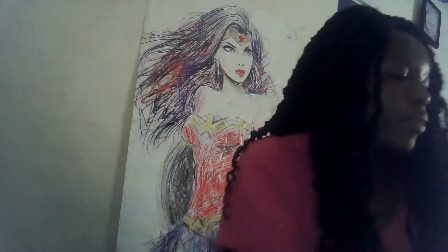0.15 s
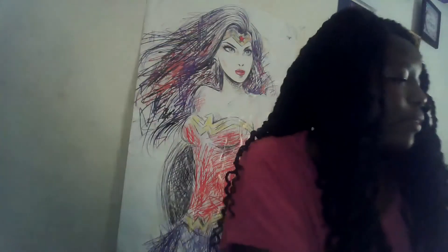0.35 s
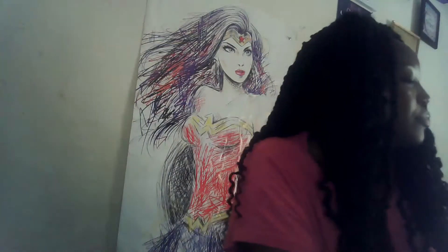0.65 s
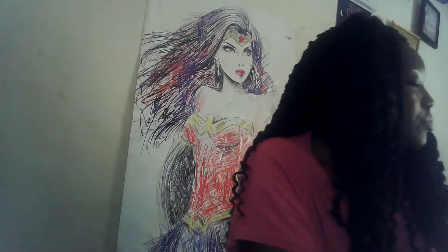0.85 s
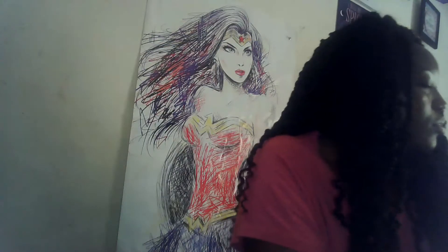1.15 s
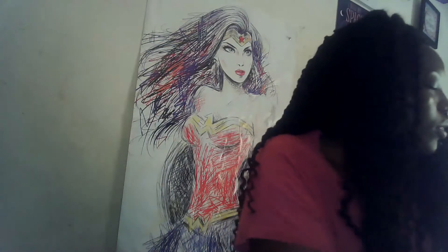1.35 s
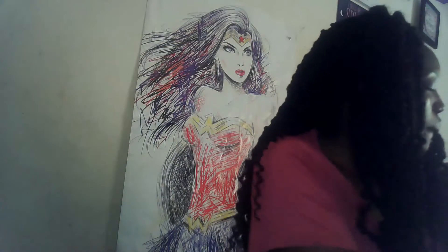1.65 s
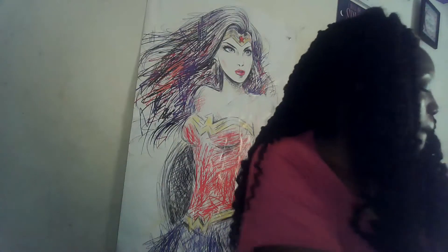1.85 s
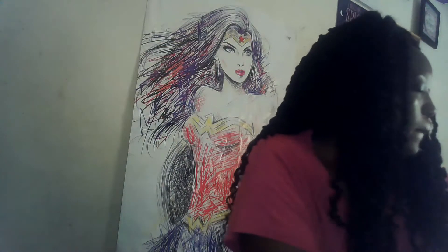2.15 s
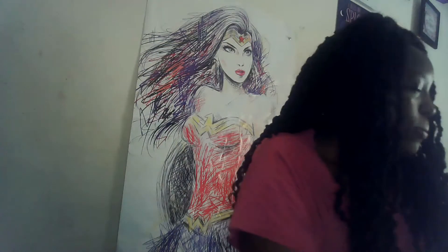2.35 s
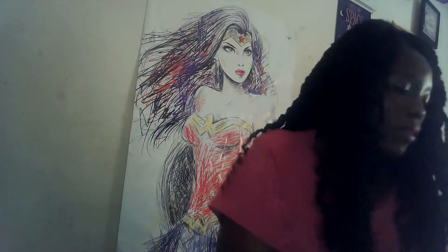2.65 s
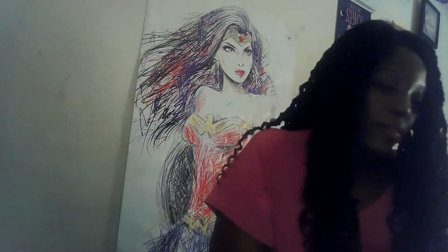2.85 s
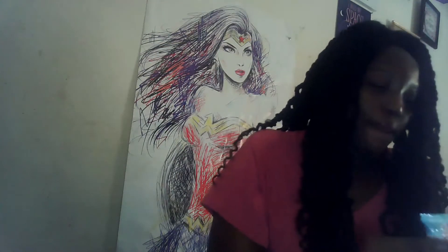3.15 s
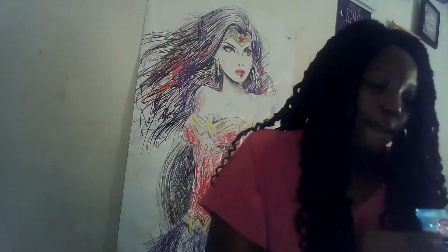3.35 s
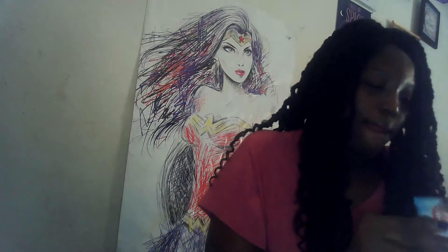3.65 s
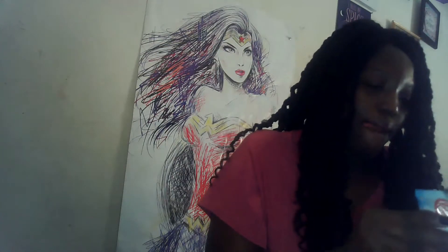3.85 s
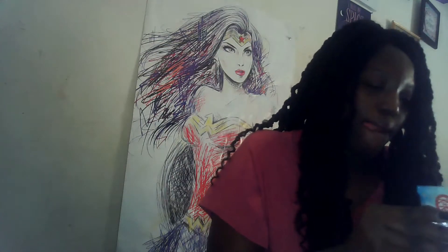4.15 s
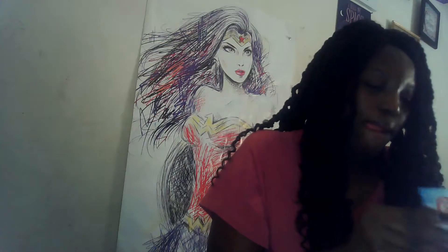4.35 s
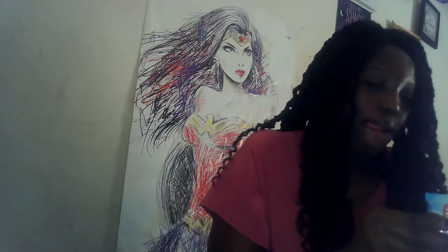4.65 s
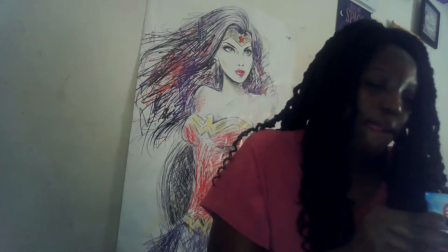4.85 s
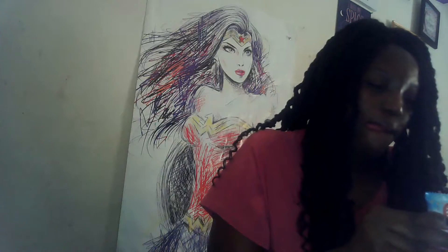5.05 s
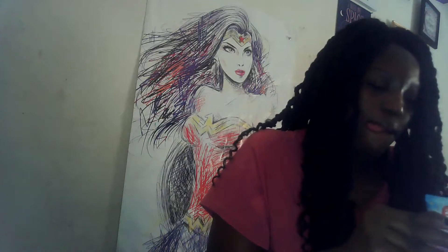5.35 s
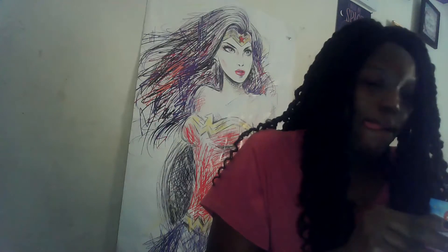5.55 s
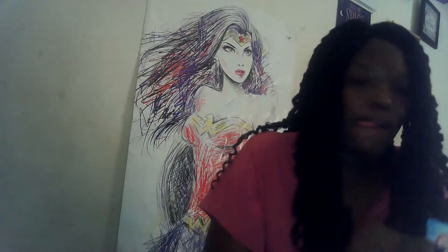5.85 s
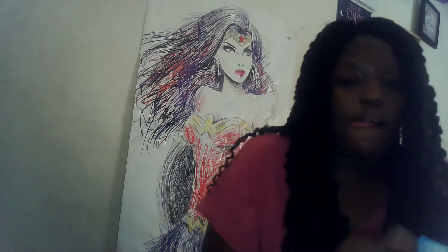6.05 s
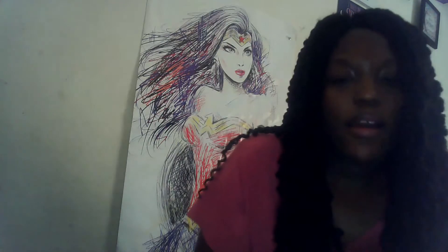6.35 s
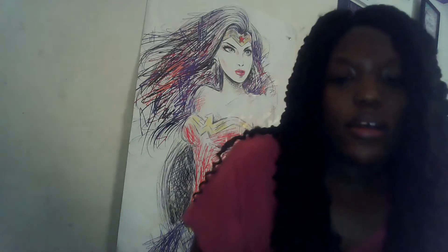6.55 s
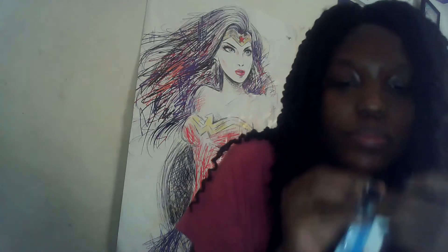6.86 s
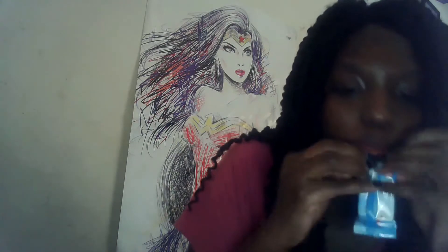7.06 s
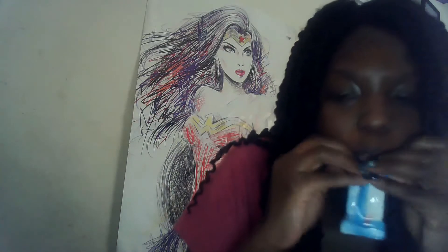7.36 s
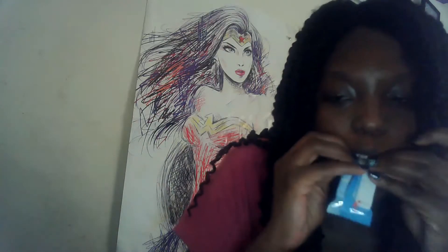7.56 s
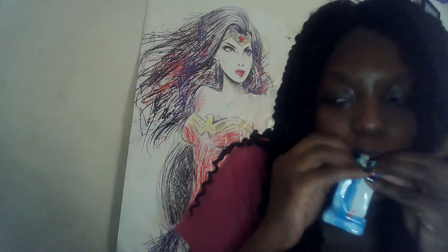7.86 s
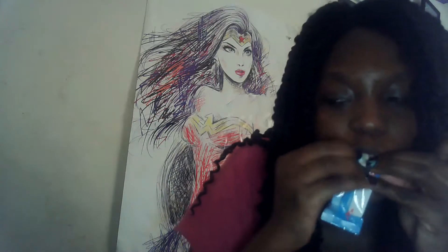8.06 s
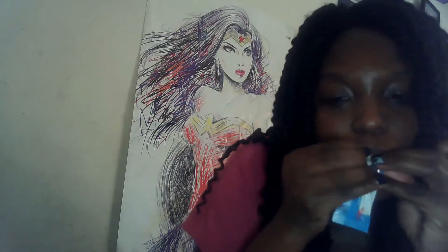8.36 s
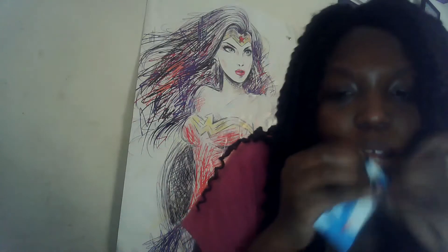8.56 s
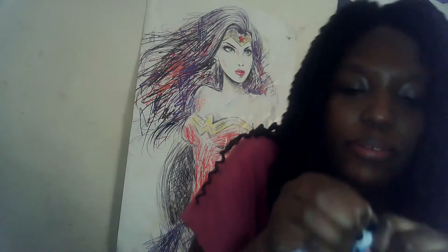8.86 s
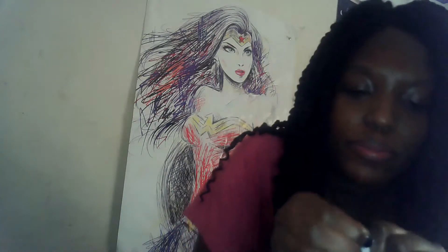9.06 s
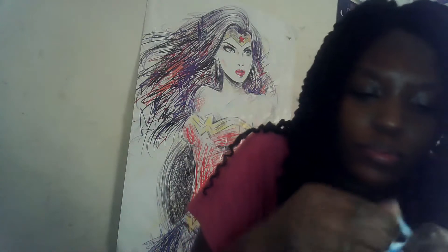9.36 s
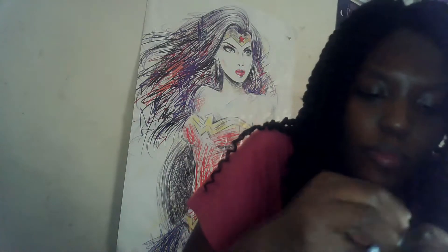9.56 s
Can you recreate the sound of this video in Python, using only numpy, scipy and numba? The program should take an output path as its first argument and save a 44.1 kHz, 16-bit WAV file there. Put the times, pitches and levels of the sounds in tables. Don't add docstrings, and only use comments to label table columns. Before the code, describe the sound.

Hands rummage noisily through a cardboard box of crinkly snack packets, then one plastic wrapper crackles, snaps and tears close to the microphone.

```python
import sys
import numpy as np
from scipy import signal
from scipy.fft import rfft, irfft
from scipy.io import wavfile
from scipy.ndimage import uniform_filter1d
from numba import njit

SR = 44100
rng = np.random.default_rng(int(sys.argv[2]) if len(sys.argv) > 2 else 0)


def pcm_store(signal):
    levels = np.round(np.clip(np.atleast_2d(signal), -1, 1) * 32767)
    wavfile.write(sys.argv[1], SR, levels.astype(np.int16).T)


def volts_from_db(level):
    exponent = np.asarray(level, float) / 20
    return 10 ** exponent


N = 428211


@njit
def add(out, at, hz, decay_s, size, phase):
    for k in range(len(at)):
        first = int(at[k]) + 1
        pole = complex(-1 / decay_s[k], 2 * np.pi * hz[k]) / SR
        ring = size[k] * np.exp(1 + pole * (first - at[k]) + 1j * phase[k]) / (decay_s[k] * SR)
        turn = np.exp(pole)
        last = min(first + int(10 * decay_s[k] * SR) + 2, len(out))
        for j in range(max(first, 0), last):
            out[j] += ring.imag * (j - at[k])
            ring *= turn


@njit
def resonate(x, hz, width_hz):
    y, band, low = np.empty(len(x)), 0., 0.
    g, damping = np.tan(np.pi * hz / SR), width_hz / hz
    for i in range(len(x)):
        v = (band + g * (x[i] + 1e-18 - low)) / (1 + g * (g + damping))
        band, low = 2 * v - band, low + 2 * g * v
        y[i] = damping * v
    return y


# frequency in Hz, density in dB per Hz.
HISS_COLOUR = [(15, -4.5), (28, 6), (65, -5), (108, 2), (293, -9), (1230, -15), (5430, -17), (16000, -20.5)]


def hiss():
    hz = np.maximum(np.arange(N // 2 + 1) * SR / N, 1)
    colour_hz, colour_db = np.transpose(HISS_COLOUR)
    colour = volts_from_db(np.interp(np.log(hz), np.log(colour_hz), colour_db))
    shared = np.clip(40 / hz, .05, .7)
    noise = rfft(rng.standard_normal(size=(3, N)))
    out = irfft(colour * (np.sqrt(shared) * noise[0] + np.sqrt(1 - shared) * noise[1:]), N)
    return out / out.mean(axis=0).std() * volts_from_db(-50.5 + np.array([[1.2], [-1.2]]))


def walls(x):
    t60_s, treble_t60_s = .22, .055
    t = np.arange(SR // 2) / SR
    noise = rng.standard_normal(size=(2, len(t))) * np.minimum(t / 0.0001, 1)
    dull = signal.lfilter(*signal.butter(2, 6500, fs=SR), noise)
    echoes = dull * volts_from_db(-60 * t / t60_s) + (noise - dull) * volts_from_db(-60 * t / treble_t60_s)
    echoes /= np.sqrt((echoes ** 2).sum() / 2)
    return signal.fftconvolve(x[None], echoes, axes=1)[:, :N]


# frequency in Hz, width in Hz, level in dB.
PORT_RINGS = [
    (4300, 1154, 17),
    (5050, 875, 17),
    (16740, 5000, 0.5),
]


def ports(air):
    rung = []
    for x in air:
        rings = sum(volts_from_db(db) * resonate(x, float(hz), float(width)) for hz, width, db in PORT_RINGS)
        rung.append(x + rings)
    left, right = rung
    right = right + volts_from_db(2.) * resonate(right, 10000., 8000.)
    pan_db = 10.
    return np.array([left * volts_from_db(pan_db / 2), right * volts_from_db(-pan_db / 2)])


# time in seconds, lead in samples.
LEFT_LEAD = [(0, 5.95), (9.7, 3.57)]


def creases(s, db, ring_hz, knock_db, tick_db, slips):
    out = np.zeros((2, N))
    lead = np.interp(s, *np.transpose(LEFT_LEAD))
    for late_ms, slip_db in slips:
        u = rng.random(size=(len(s), 9)).T
        at = s * SR + u[0] * late_ms * SR / 1000
        hz = ring_hz if late_ms == 0 else 3500 * 1.908 ** u[1]
        ring = (hz, .0002, -9.)  # Hz, decay in s, dB
        knock = (1050 * 2.75 ** u[2], .00065, knock_db - 3.0)
        tick = (10000 * 1.64 ** u[3], .00005, tick_db + 10.5 - abs(late_ms))
        for (part_hz, decay_s, part_db), turn in zip([ring, knock, tick], u[4:]):
            for port, sign in enumerate([1, -1]):
                phase = 2 * np.pi * turn + port * 4.2 * (u[7] - .5)
                size = volts_from_db(db + slip_db * (.6 + .8 * u[8]) + part_db + sign * 3 * (u[1] - .5))
                decays = np.full(len(s), decay_s)
                add(out[port], at + port * lead, np.minimum(part_hz, .4 * SR), decays, size, phase)
    return out


def swarm(effort_db, knock_db, tick_db, scatter_db, span_s, count):
    u = rng.random(size=(count, 3)).T
    start_s, end_s = span_s
    at = ((start_s + u[0] * (end_s - start_s)) * SR).astype(int).clip(0, N - 1)
    db = effort_db[at] - scatter_db * np.log(u[1] + 0.16)
    return creases(at / SR, db, 2800 * 3.17 ** u[2], knock_db[at], tick_db[at], [(0, 0), (2.5, -5.5)])


# start in seconds, effort in dB, hold in ms, cardboard bump in dB against the effort.
BOX_GRABS = [(0.0, -37, 7.5, -17), (0.05, -37, 18, -21), (0.175, -30.5, 50, -26), (0.3, -32, 17.6, -13.5),
             (0.353, -20.5, 4.2, -24), (0.413, -30, 11.7, -13), (0.466, -35.5, 58, -9),
             (0.538, -19.5, 10.4, -25), (0.597, -15, 8.1, -20.5), (0.644, -22.5, 7.3, -16),
             (0.69, -32.5, 18, -10.5), (0.776, -24, 27.6, -16), (0.82, -33.5, 4.3, -2),
             (0.869, -25, 13.5, -21.5), (0.945, -27, 18.6, -16.5), (1.007, -23.5, 10.5, -21),
             (1.056, -22, 18.2, -15.5), (1.089, -39, 17, -7), (1.176, -26.5, 27, -15.5),
             (1.268, -32, 35, -21.5), (1.415, -17.5, 12, -21.5), (1.534, -24.5, 12.5, -23),
             (1.611, -31.5, 24.6, -22), (1.73, -21, 19.5, -19), (1.912, -30.5, 15.5, -14.5),
             (1.977, -33, 16, -32), (2.036, -34.5, 26.6, -18.5), (2.185, -36.5, 11.3, -14.5),
             (2.26, -34.5, 13, -21), (2.304, -44, 41, -20)]


def grabs(db):
    power = np.full(N, 1e-9)
    for (s, _, hold_ms, _), level in zip(BOX_GRABS, volts_from_db(db)):
        start = int((s + .004) * SR)
        t = np.arange(SR // 2) / SR / (max(hold_ms, 5) / 1000)
        power[start:start + len(t)] += level ** 2 * t * np.exp(1 - t)
    step = SR // 60
    fidget = uniform_filter1d(np.repeat(rng.standard_normal(N // step + 1), step), step)[:N]
    return 10 * np.log10(power) + 3. * fidget


# frequency in Hz, width in Hz, level in dB.
CARDBOARD_MODES = [(82, 15, -0.5), (234, 65, 4.5), (334, 76, 7.5), (770, 800, 4.5), (1047, 130, 12.5),
                   (1210, 580, 0.5)]


def box():
    _, grab_db, _, bump_db = np.transpose(BOX_GRABS)
    packets = swarm(grabs(grab_db) - 9.5, np.full(N, -11.), np.full(N, -18.), 4.6, (0, 2.6), count=3500)
    u = rng.random(size=(3, N))
    bumps = (u[0] < .05) * volts_from_db(-2.5 * np.log(u[1])) * np.sign(u[2] - .5)
    body = np.zeros(N)
    for k, (hz, width, db) in enumerate(CARDBOARD_MODES):
        body += (-1) ** k * volts_from_db(db) * resonate(bumps, float(hz), float(width))
    body = body / body.std() * volts_from_db(grabs(grab_db + bump_db) + 4.5)
    return packets + np.array([body, np.roll(body, shift=4) * volts_from_db(1.0)])


# start in seconds, peak in dB,
# frequency in Hz.
AIR_POPS = [(0.053, -36.5, 696), (1.281, -28, 1000), (1.458, -28, 1000), (2.058, -38, 755),
            (3.4255, -39.5, 1300), (0.647, -26, 1200), (4.1, -47, 504), (4.176, -41.5, 500),
            (5.806, -47, 493), (6.778, -45, 415), (7.075, -39, 706), (8.205, -48, 657), (8.218, -48, 650),
            (8.241, -50, 830), (8.257, -43, 695), (8.356, -42, 710), (8.463, -46, 766), (8.514, -47, 720),
            (8.659, -43, 660), (9.274, -45.5, 630), (9.266, -37, 2720)]
# start in seconds, peak in dB, frequency in Hz.
HOLLOW_KNOCKS = [
    (0.612, -21, 1050),
    (0.655, -21, 1260),
    (9.2605, -41, 2800),
    (9.2745, -42, 2500),
]


def pops(table):
    s, db, hz = np.transpose(table)
    out = np.zeros(N)
    add(out, s * SR, hz, np.full(len(s), .00093), volts_from_db(db + 4), 2 * np.pi * rng.random(len(s)))
    return out


SNAP_LATE_S, SNAP_TICK_DB = 0.000911, 6.5

# start in seconds, peak in dB, ring in Hz, bright tick in dB.
SMALL_TICKS = [(4.0735, -24.5, 3800, -11), (0.2077, -29, 3530.0, -13), (0.256, -19, 3800, -17),
               (0.2934, -21, 3790.0, -22), (0.2996, -25, 3500, -19), (0.6078, -15, 3000, -34),
               (0.6918, -10, 4090.0, -26), (0.7539, -23, 3680, -28.0), (0.8092, -16.0, 5000.0, -18),
               (0.8254, -12, 4260.0, -27), (0.8741, -15, 4480.0, -26), (1.0078, -14, 4740.0, -17.5),
               (1.0725, -15, 5660, -12), (1.1355, -23, 4350.0, -21), (1.2839, -13, 4730, -31),
               (1.4547, -13, 4300, -21), (1.4686, -17.0, 4660, -17), (1.4832, -21, 5000, -31.0),
               (1.6174, -22, 5600, -21), (1.6229, -20, 4070, -26), (1.6593, -22, 4390.0, -24),
               (1.7194, -21, 4170, -21), (1.7532, -29, 5250.0, -27), (1.8051, -24, 5170.0, -12),
               (1.9199, -22, 3010.0, -29), (1.9799, -18.5, 5600, -23), (1.9872, -12.5, 5430, -30.0),
               (2.0279, -30.0, 5600.0, -16), (2.0459, -20, 4130.0, -18), (2.1984, -18, 5100, -27.0),
               (2.4692, -34, 5070, -20.0), (2.6908, -25.5, 4770, -18.0), (8.692, -38, 4500, -5),
               (3.0469, -29, 5300.0, -25), (3.1676, -22, 5300, -15), (3.2036, -20, 5040.0, -28.0),
               (3.2272, -36, 4220.0, -26.0), (3.2671, -31, 4950.0, -22.0), (3.3043, -23, 5170.0, -15),
               (3.4347, -16, 4820.0, -28), (3.4945, -33, 5300, -20), (3.6621, -27, 5260, -9),
               (3.818, -27, 6900, -6), (8.581, -37, 4500, 0), (3.8944, -34, 4310.0, -10),
               (4.1005, -36, 5300, -20.0),
               (4.128, -22.5, 5270, -9), (4.3752, -39, 5120.0, -16.0), (4.49, -29.5, 4350.0, -18),
                    (4.5428, -39, 4350.0, -12), (4.823, -32, 5300, -18), (5.2573, -23.5, 4620, -5.5),
                    (5.6423, -32, 4780.0, -8), (5.78, -20, 6000, -15), (5.969, -26, 4390.0, -8),
                    (6.046, -26, 6890.0, -3), (6.0659, -23, 6400, 0.5), (6.5012, -16.5, 5810.0, -16),
                    (6.5547, -19.5, 5560, -14), (6.6139, -41, 5120.0, -22), (6.719, -27, 4960, -21),
                    (6.728, -11, 5000, -24), (6.8587, -28, 4740.0, -25), (6.888, -14, 4700, -17),
                    (6.902, -18.5, 5040.0, -13), (6.9735, -26, 5430.0, -7), (6.9777, -26, 4780.0, -15.0),
                    (7.0555, -29, 3660.0, -9), (7.096, -20.5, 5030, -19), (7.1927, -32.5, 4900, -10),
                    (7.2667, -30, 4780.0, -10), (7.283, -32.0, 5040.0, -12), (7.2875, -30, 5080.0, -15.0),
                    (7.301, -32.0, 5030, -15), (7.3743, -34, 5170.0, -20.0), (7.4637, -28, 5000, -20),
                    (7.8582, -28, 4850, -18), (8.4, -26.0, 5510.0, -16), (8.406, -26, 4220, -5),
                    (8.5337, -13, 4000, -30), (8.63, -28, 3730, -24), (8.7327, -22, 4960, -22),
                    (8.8744, -24.5, 4800, -11), (8.8939, -21.0, 5040.0, -8), (8.945, -25, 3660.0, -7),
                    (9.11, -23.5, 3960.0, -12), (9.1797, -24, 5160, -20), (9.2328, -38, 5210.0, -24),
                    (9.3152, -34, 4950.0, -23.0), (9.351, -19, 4910.0, -16), (9.4044, -21.5, 5170.0, -14),
                    (9.4724, -26, 5000.0, -20.0), (9.533, -24, 4070, -22)]
FURTHER_TICKS = [(2.585, -36, 4400, -24), (7.7545, -43, 4450, -2), (5.2115, -38, 5000, -18),
                 (5.346, -36, 5200, -7), (5.387, -41, 5200, -12), (5.4085, -41, 4300, -3),
                 (7.945, -31, 4500, -18)]


def ticks(table):
    s, db, hz, tick_db = np.transpose(table)
    slips = [(0, -4), (-.8, -7), (1.2, -5), (2.2, -7), (5, -13)]
    return creases(s + SNAP_LATE_S, db - 6, hz, np.full(len(s), -17), tick_db + SNAP_TICK_DB, slips)


# start in seconds, length in seconds, effort in dB, bright tick in dB.
FINGER_SQUEEZES = [(2.571, 0.32, -42.5, -21), (2.999, 0.21, -38, -8), (3.197, 0.13, -36, -14),
                   (3.408, 0.12, -30.5, -6.5), (3.558, 0.12, -34.5, -8), (3.76, 0.2, -45.5, -19),
                   (4.06, 0.067, -33.5, -13), (4.159, 0.23, -37.5, -11), (4.4, 0.58, -52, -13),
                   (5.228, 0.021, -33, -12), (5.56, 0.12, -44.5, -8), (5.78, 0.032, -28.5, -15),
                   (5.937, 0.052, -29.5, -13), (6.02, 0.092, -34.5, -26), (6.358, 0.26, -38.5, -13),
                   (6.684, 0.065, -29.5, -17), (6.837, 0.36, -41.5, -15), (7.2, 0.093, -38.5, -6),
                   (7.355, 0.048, -41, -12), (8.131, 0.2, -37.5, -3), (8.19, 0.23, -37, -0.5),
                   (8.476, 0.062, -26.5, -20), (8.608, 0.014, -26, -11), (8.887, 0.031, -26.5, -0.5),
                   (9.107, 0.064, -32.5, -14), (9.245, 0.033, -27.5, -19), (9.319, 0.054, -33.5, -14),
                   (9.605, 0.081, -47.5, 2)]


def squeezes(db):
    attack_s, sag_db_per_s, release_db_per_s, idle_db = 0.0069, 15.5, 367, -57
    power = np.full(N, volts_from_db(idle_db) ** 2)
    t = np.arange(SR) / SR
    for (s, length_s, _, _), level_db in zip(FINGER_SQUEEZES, db):
        start = int(s * SR)
        fall_db = sag_db_per_s * t + release_db_per_s * np.maximum(t - length_s, 0)
        grip = np.minimum(t / attack_s, 1) * volts_from_db(level_db - fall_db)
        power[start:start + SR] += grip[:N - start] ** 2
    return 10 * np.log10(power)


def wrapper():
    _, _, effort_db, tick_db = np.transpose(FINGER_SQUEEZES)
    effort = squeezes(effort_db)
    brightness = squeezes(effort_db + tick_db) - effort
    return swarm(effort - 14, np.full(N, -14.), brightness, 7.66, (2.45, N / SR), count=9000)


# start in
# seconds, # peak in dB, ring in Hz, knock in dB, bright tick in dB.
BOX_SNAPS = [(0.0504, -7.5, 3880, -20, -21), (0.2194, -16.5, 5130, -30, -9.5), (0.3111, -18, 4010, -7, -23),
             (0.3591, -12, 5340, -15, -20), (0.4154, -21.5, 4360, -5, -34), (0.547, -12, 5340, -14, -17),
             (0.5566, -11, 5270, -30, -18), (0.646, -8, 4470, -12, -15), (0.7096, -17, 5040, -16, -40),
             (0.7852, -13.5, 4040, -25, -20), (0.8878, -7.5, 4400, -33, -17),
             (0.9535, -11.5, 4300, -24, -20), (1.0183, -6.5, 5770, -23, -21), (1.057, -13, 5050, -4, -17),
             (1.18, -15.5, 5270, -13, -17.5), (2.189, -22, 4960, -13, -22), (2.27, -22.5, 4000, -24, -33)]
WRAPPER_SNAPS = [(2.633, -27.5, 4340, -34, -33), (2.681, -26.5, 5050, -11, -14),
                 (2.7804, -28.5, 5320, -14, -17), (2.816, -20, 5470, -38, -22),
                 (2.871, -24.5, 5240, -21, -14.5), (2.9563, -24, 3870, -16, -20),
                 (3.0056, -20, 4500, -19, -19), (3.038, -11.5, 5300, -50, -19),
                 (3.084, -13, 4990, -25, -18), (3.1409, -22, 4870, -12.5, -4.5),
                 (3.1958, -9, 5240, -25.5, -21.5), (3.2575, -16, 6200, -25, -21),
                 (3.2942, -21.5, 4750, -17, -11), (3.3109, -14.5, 4650, -38, -7.5),
                 (3.403, -35, 5630, -12, -2), (3.424, -10, 4600, -22, -12.5), (3.491, -20, 5170, -40, -8.5),
                 (3.5655, -15.5, 5340, -26, -14.5), (3.6374, -9.5, 6100, -24.5, -12.5),
                 (3.7882, -30.5, 5340, -31, -12), (3.843, -16.5, 5270, -27, -10.5),
                 (4.0492, -22, 5340, -14, -18), (4.109, -13, 4950, -24, -16.5),
                 (4.1766, -12, 5750, -18.5, -19),
                 (4.2335, -19.5, 5960, -47, -19), (4.273, -25.5, 5300, -15.5, -6.5),
                  (4.309, -14.5, 5260, -26, -10.5), (4.471, -25, 5450, -17, -18),
                  (4.6219, -32, 5170, -18, -19), (4.7082, -32, 4500, -15, -14),
                  (4.7917, -30, 4510, -25, -27), (5.234, -18, 4600, -22, -26), (5.455, -27, 4800, -28, -19),
                  (5.567, -31, 5340, -17, -17), (5.6664, -27, 4900, -19, -6), (5.7902, -18, 5500, -36, -9),
                  (5.806, -19.5, 4830, -11.5, -8), (5.9333, -21, 5250, -24, -16),
                  (5.9593, -23, 5750, -14, -26), (6.0337, -23.5, 3320, -34, -13),
                  (6.056, -23, 5100, -25, -10), (6.096, -26, 5100, -22, 1.5),
                  (6.392, -25.5, 5570, -21, -1.5), (6.428, -23, 4080, -10.5, -24),
                  (6.4901, -20, 5900, -13.5, -12), (6.5386, -14, 5570, -22, -25),
                  (6.7108, -12, 4530, -23, -20.5), (6.7742, -21.5, 5070, -8.5, -19),
                 (6.8471, -20, 4440, -16, -21.5), (6.883, -14.5, 4760, -17, -19),
                 (6.8945, -14, 5100, -47, -12), (6.9453, -20.5, 4720, -16, -10),
                 (6.9646, -10, 4500, -29, -20), (7.0185, -23, 4700, -40, -19),
                 (7.0756, -1.5, 4700, -41, -32), (7.2176, -16, 5550, -44, -11.5),
                 (7.3883, -11, 4940, -28.5, -20), (7.456, -25.5, 4960, -13, -23),
                 (7.5912, -10.5, 5070, -51, -22.5), (7.6467, -18.5, 4300, -36, -11.5),
                 (7.6965, -12.5, 4260, -26.5, -12.5), (7.782, -12, 4940, -27, -19),
                 (7.9167, -20, 4300, -32, -6.5), (7.9968, -33.5, 4470, -30, -10),
                 (8.1202, -20.5, 4900, -33, -23), (8.1388, -18.5, 4500, -23.5, -12.5),
                 (8.2023, -26, 5600, -25, -20), (8.216, -12.5, 4770, -18, -18), (8.243, -5, 4860, -25, -23),
                 (8.287, -16.5, 4280, -17, -12), (8.3021, -16.5, 4800, -15.5, -14),
                 (8.3524, -6, 4960, -21.5, -19.5),
                 (8.4595, -17.5, 5200, -21, -24), (8.489, -17.5, 3800, -24, -14),
                 (8.5002, -18.5, 4170, -24, -13), (8.515, -16.5, 5360, -21, -15),
                 (8.539, -16, 4600, -20, -11), (8.633, -15, 3600, -15, -8), (8.6596, -17.5, 3250, -11, -19),
                 (8.6834, -20, 4530, -22, -19), (8.7275, -12.5, 4760, -23.5, -23),
                 (8.802, -31, 4930, -29, -11), (8.832, -26, 5350, -33, -1), (8.9013, -17, 4740, -37, -1.5),
                 (8.9131, -2.5, 4300, -37, -16), (8.9304, -18, 4320, -11, -8), (8.987, -9, 4640, -18, -20),
                 (9.1172, -13, 4340, -24, -23), (9.1908, -24, 4780, -26, -20), (9.259, -25, 4600, -8, -5.5),
                 (9.2847, -22.5, 4930, -31, -12), (9.3274, -24.5, 4860, -18, -14),
                 (9.3562, -8.5, 4100, -34, -23), (9.3891, -21.5, 5200, -13, -17),
                 (9.463, -29.5, 4760, -13, -17), (9.5283, -18.5, 4000, -14, -22.5)]
FURTHER_SNAPS = [(2.3153, -19, 4180, -11, -32), (2.7612, -28.5, 4300, -13, -25),
                 (7.064, -18, 4200, -16, -10.5), (9.2655, -21, 3000, -13, -30),
                 (9.6764, -24, 4400, -13.5, -28)]


def snaps():
    creak = [(-.8, -10), (-3., -19)]
    slips = [(0, -6), (.8, -7), (1.2, -7), (1.8, -8), (2.8, -9), (4.5, -10), (7, -13), (12, -16),
             (18, -20), (30, -23)]
    wrapper_snaps = WRAPPER_SNAPS
    s, db, hz, knock_db, tick_db = np.transpose(BOX_SNAPS + wrapper_snaps + FURTHER_SNAPS)
    return creases(s + SNAP_LATE_S, db - 4.5, hz, knock_db + 5, tick_db + SNAP_TICK_DB, creak + slips)


def scene():
    packets = box()
    film = snaps() + wrapper() + ticks(SMALL_TICKS) + pops(AIR_POPS)
    film_right_db = 1.5
    film = film * volts_from_db(np.array([[-film_right_db], [film_right_db]]) / 2)
    film_to_walls = signal.lfilter([2.4, -3.3, 1.15], 1, film) * volts_from_db(-9.)
    box_to_walls = (packets - uniform_filter1d(packets, size=32)) * volts_from_db(-5)
    air = film + packets + walls((film_to_walls + box_to_walls).mean(axis=0))
    air = air + ticks(FURTHER_TICKS) + pops(HOLLOW_KNOCKS)
    return ports(air) + hiss()


def band_limit(x):
    return signal.sosfilt(signal.butter(12, 16640, fs=SR, output="sos"), x)


def record(dry):
    x = signal.sosfilt(signal.ellip(8, .2, 55, 15900, fs=SR, output="sos"), dry)
    return band_limit(np.clip(x, -1, 1))


dry = scene()
out = record(dry)
pcm_store(out)
```